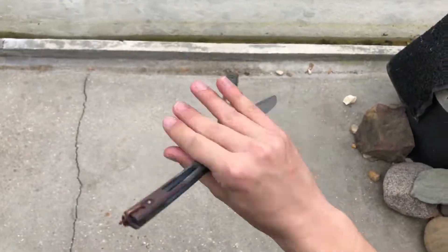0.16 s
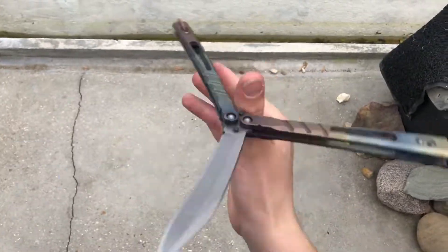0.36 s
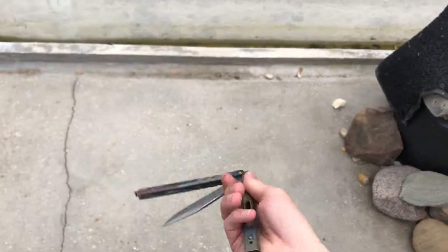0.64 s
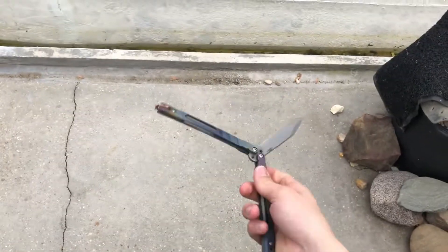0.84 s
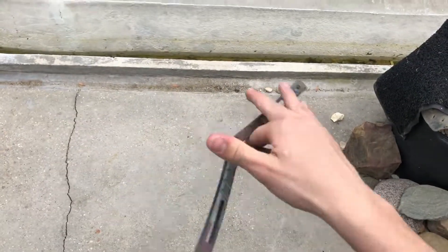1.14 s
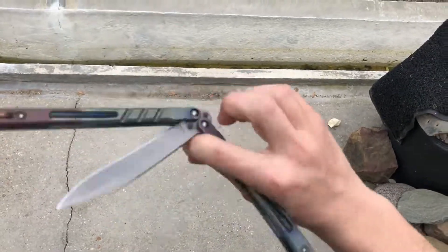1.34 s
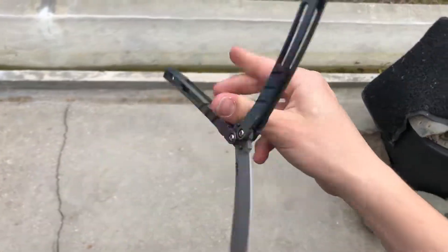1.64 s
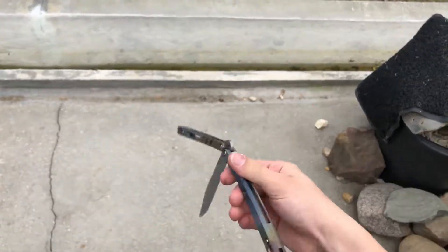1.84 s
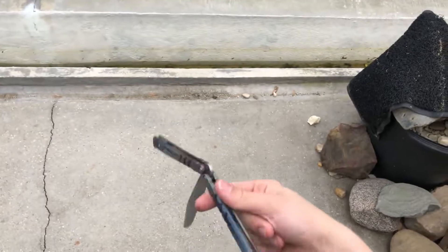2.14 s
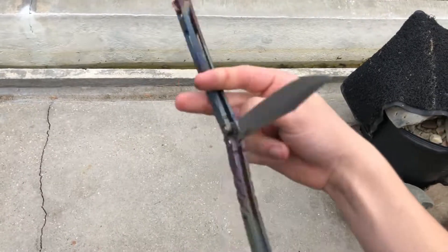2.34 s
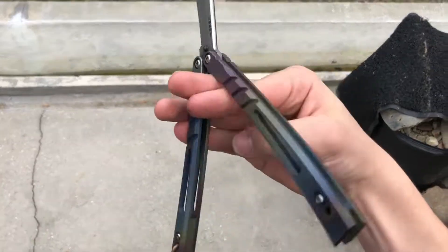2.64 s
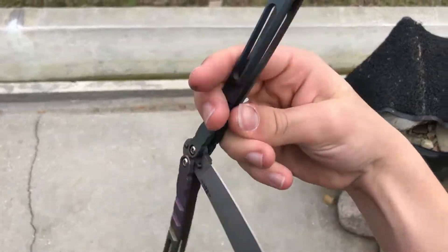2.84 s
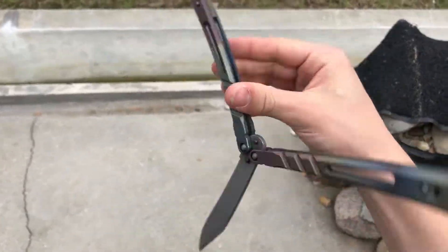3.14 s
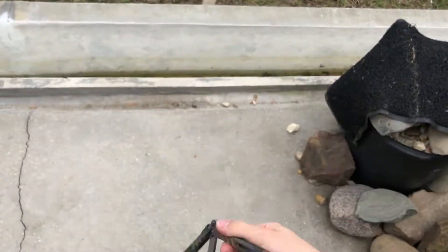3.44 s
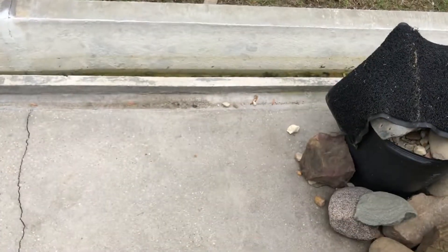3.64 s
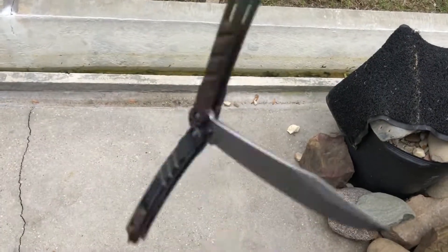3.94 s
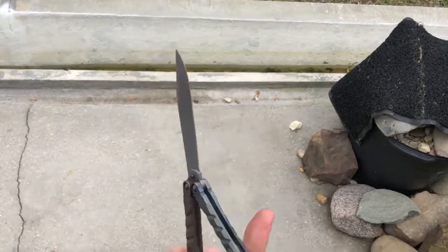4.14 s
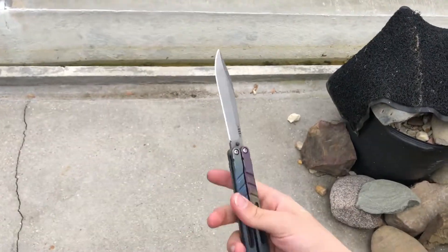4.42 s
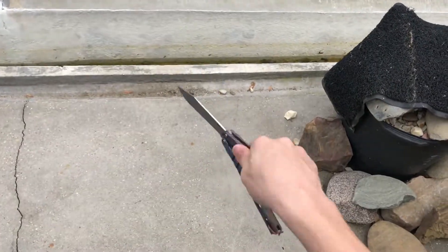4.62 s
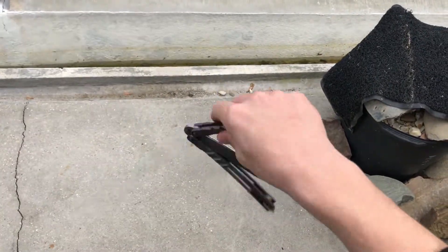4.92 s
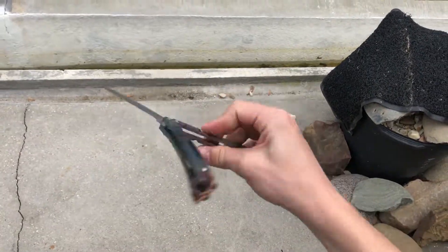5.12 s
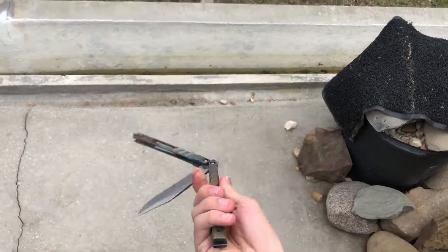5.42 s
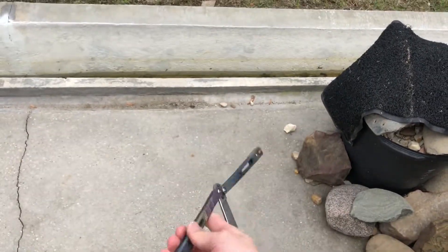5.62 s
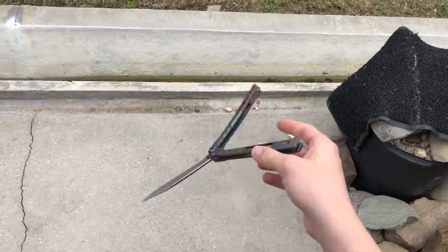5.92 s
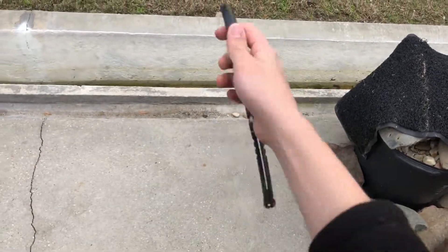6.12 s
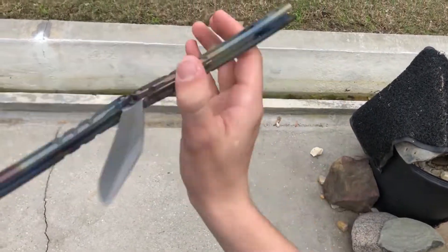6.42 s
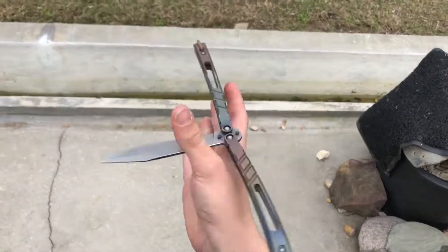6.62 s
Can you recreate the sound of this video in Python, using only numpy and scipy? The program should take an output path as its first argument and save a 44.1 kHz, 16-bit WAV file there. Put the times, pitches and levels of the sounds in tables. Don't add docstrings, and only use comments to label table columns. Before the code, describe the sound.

Outdoors in a concrete yard, a folding knife with two swinging metal handles is flipped close to a phone microphone. Faint low traffic and a thin high insect buzz continue throughout. Light steel touches start at once, while a duck quacks faintly four times between 0.2 and 0.9 s amid tiny bird whistles. Bright dry knocks hit at 0.8 and 1.0 s, then a very hard one at 1.55 s lands with a palm slap. Softer clicks at 2.1 s lead to pin knocks and loose rattling around 2.6 s; the duck calls again from 2.5 to 3.0 s, and a firm clack follows at 3.05 s. Birds chirp. After a knock at 3.7 s, the handles slam at 4.3 s in a loud, buzzing metallic burst. A distant truck drone wavers. Quick bounces rattle at 4.8 s, knocks fall at 5.3 and 5.6 s, then faint taps, finger rubs and a harsh chirp close.

```python
import sys
import numpy as np
from scipy import signal
from scipy.fft import rfft, irfft
from scipy.io import wavfile
from scipy.ndimage import uniform_filter1d

SR = 44100
rng = np.random.default_rng(int(sys.argv[2]) if len(sys.argv) > 2 else 0)


def bounce(signal):
    frames = np.transpose(np.atleast_2d(signal))
    limited = np.clip(frames, -1, 1)
    pcm = np.round(limited * 32767).astype(np.int16)
    wavfile.write(sys.argv[1], SR, pcm)


def voltage_ratio(decibels):
    exponent = np.asarray(decibels, float) / 20
    return 10 ** exponent


N = 298557

# (frequency [Hz], level [dB per Hz])
TRAFFIC_SPECTRUM = [(15, -68.5), (25, -38.5), (42, -19), (65, -21.5), (83, -8.5), (103, -8.5), (167, -16),
                    (445, -30.5), (483, -26.5), (524, -28), (1090, -31), (2980, -49.5), (7300, -59),
                    (8140, -59.5), (16500, -74)]
ROAR_DB = -54

# (time [s], frequency [Hz], level [dB])
TRUCK = [(2.2, 116.6, -56.5), (2.35, 116.3, -51), (3.2, 109.5, -44.5), (3.9, 104.4, -52), (4.2, 104, -42),
         (4.39, 102.5, -36), (4.6, 103, -41.5), (5.0, 101.2, -35), (5.46, 102, -34), (6.02, 102, -36.5),
         (6.46, 102, -46), (6.77, 101.7, -42)]
VAN = [(0, 95, -43.5), (.25, 96, -74), (.9, 98, -60), (1.25, 100.2, -48.5), (2.2, 101.5, -46),
       (2.35, 97.6, -46.5), (2.6, 95.5, -48.5), (3.3, 94.3, -46), (3.7, 92, -61.5), (4.4, 90, -51),
       (5.3, 92, -68), (6.0, 94, -51), (6.77, 94, -68)]
CAR = [(0, 186.8, -56.5), (.9, 193.3, -59.5), (1.2, 187, -63.5), (2.2, 188.8, -59), (3.2, 186.8, -58.5),
       (4.5, 181.7, -61.5), (5.2, 178.5, -67), (5.7, 182.6, -62), (6.2, 192.2, -60.5), (6.77, 191.5, -61.5)]
# (time [s], loss [dB])
GUSTS = [
    (4.298, -11.5),
    (4.488, -15),
    (5.091, -8),
    (5.36, -5.5),
    (5.54, -4.5),
    (5.69, -4.5),
    (5.89, -9.5),
    (6.109, -14.5),
]
GUST_HALF_S = 0.085

INSECT_HZ, INSECT_WIDTH_HZ, INSECT_PULSES_PER_S, INSECT_DB = 8310, 450, 58, -82
# (frequency [Hz], width [Hz], level [dB])
CHORUS = (9000, 1500, -86.5)

# (time [s], length [s], first pitch [Hz], last pitch [Hz], level [dB])
WHISTLES = [(0.138, 0.055, 9950, 9900, -87), (0.263, .03, 9600, 9400, -81), (.35, 0.0565, 9900, 10200, -84),
            (0.193, 0.039, 7470, 6940, -69.5), (0.3, 0.042, 7200, 6960, -80),
            (.695, 0.035, 9750, 9600, -82), (0.744, .03, 9450, 9170, -76),
            (3.326, 0.034, 5430, 5850, -72.5), (3.388, 0.02, 4800, 4580, -71),
            (3.462, 0.097, 6600, 8060, -77.5), (5.007, 0.022, 6260, 6000, -70.5),
            (5.034, 0.092, 6120, 6050, -76), (5.419, 0.11, 3850, 3650, -77),
            (2.063, 0.014, 6200, 7230, -77), (2.897, 0.032, 5590, 5630, -82),
            (5.553, 0.15, 5320, 5400, -87), (5.774, 0.037, 3170, 3210, -73)]
WHISTLE_SHAKE_HZ = 25
# (time [s], length [s], level [dB], pitch shake [Hz])
CHIRPS = [
    (0.544, 0.077, -67.5, 370),
    (1.909, 0.12, -71.5, 270),
    (3.149, 0.081, -69.5, 290),
    (6.449, 0.16, -69, 710),
]
CHIRP_FIRST_HZ, CHIRP_LAST_HZ = 4840, 4140

# (time [s], length [s], pitch [Hz], level [dB], roughness [0-1])
QUACKS = [
    (0.201, 0.063, 258.6, -58.5, 0.56),
    (0.461, 0.046, 245.3, -58, 0.58),
    (0.666, 0.062, 254.4, -53.5, 0.37),
    (0.902, 0.048, 255, -55.5, 0.78),
    (2.509, 0.064, 244, -59, 1.06),
    (2.716, 0.046, 255, -58, 0.73),
    (2.954, 0.052, 238, -54.5, 0.7),
]
# (frequency [Hz], width [Hz], level [dB])
BILL = [(982, 200, 10.5), (1732, 260, 10), (2860, 610, -6), (3150, 720, -4.5), (4670, 730, -17.5)]

# (time [s], length [s], level [dB])
RUBS = [(0.025, .06, -75), (.4, .07, -76), (1.439, 0.14, -74), (1.695, 0.1, -80), (2.316, 0.088, -78),
        (2.802, 0.063, -71), (2.88, 0.029, -77.5), (2.994, 0.064, -76), (3.09, 0.23, -78),
        (4.652, 0.14, -76), (5.395, 0.12, -76.5), (6.12, 0.05, -83), (6.241, 0.066, -75.5),
        (6.46, 0.16, -72)]
# (time [s], level [dB], length [s], last pitch [Hz])
PALM_SLAPS = [
    (1.549, -40.5, 0.0024, 500),
    (1.563, -39, 0.0035, 436),
    (1.58, -46, 0.003, 500),
    (4.227, -31.5, 0.0056, 220),
    (4.292, -44, 0.013, 604),
]
PALM_OPEN_HZ = 1260

# (time [s], peak [dB], low clack [dB], top [dB], handle ring [dB])
KNOCKS = [(0.0422, -35.5, 7.5, -4, -32), (0.832, -18.5, 3.5, 2, -11), (0.8378, -26, -20, -2, -36),
          (1.0396, -10.5, -3, 2.5, -38.5), (1.0682, -20.5, 5.5, 4, -30.5), (1.074, -29, -6, 1, -27),
          (1.0878, -26.5, -2, -10, -23), (1.098, -32, 5, -6, -28), (1.5463, -6.5, 8.5, 6, -17.5),
          (3.69, -29.5, 8, 1.5, -15), (4.2265, -30, 7.5, -13, -32), (4.2665, -18, 9.5, 0, -28),
          (5.2938, -22.5, 9.5, -7.5, -17), (5.635, -18, -1.5, -0.5, -21)]
# (time [s], peak [dB], top [dB], blade ring [dB])
GRAZES = [(0.4153, -49, -1, -16), (0.4482, -44.5, -11, -11), (0.529, -45.5, -3, -11),
          (0.652, -42.5, -11, -16), (0.833, -19, -14, -18), (1.0402, -15.5, 2, -29),
          (1.319, -49.5, -9, -21), (1.497, -51, -15, -31), (1.5473, -8.5, 2.5, -26), (1.5487, -16, 4, -13),
          (1.5616, -12, 2, -14), (1.5628, -9.5, 10, -11), (1.5726, -14, -7, -8), (1.5749, -27, -4, -19),
          (1.759, -56.5, -1, -23), (2.1213, -43, 16, -15), (2.246, -67, 0, -25), (3.1393, -53, 1, -18),
          (3.4383, -50.5, -7, -17), (5.0194, -62, 6.5, -26.5), (5.246, -45.5, 1, -32),
          (6.1393, -64.5, 0, -11.5), (6.2853, -51, -8, -5.5), (6.3608, -55, -3, -8),
          (6.4344, -56.5, 5, -25), (6.4715, -48.5, 0, -9), (6.5368, -46, -4, -18)]
GRAZE_CLACK_DB, GRAZE_RING_DB = 2.5, -28
# (time [s], peak [dB], low clack [dB], top [dB], tang ring [dB])
PIN_KNOCKS = [
    (0.0613, -43, 7, -15, -16),
    (2.114, -31, 10.5, -8, -22),
    (2.142, -34, 13, -4, -17),
    (2.5363, -57, 5, -8, -20),
    (2.5524, -22, 4.5, -3, -20.5),
    (2.607, -41, 4, -8, -3),
    (2.6822, -44, 0, 4, -15),
    (2.6904, -33.5, -6, -19, -28),
    (3.054, -18.5, 7, -2, -12.5),
]
# (time [s], peak [dB], low clack [dB], top [dB], tang ring [dB])
TANG_KNOCKS = [
    (4.778, -23.5, 8, 1, -17),
    (4.7839, -32, -2, -8, -25),
    (4.7895, -25, 2, 0, -13),
    (4.7972, -31, 1, -8, -4),
    (4.8024, -37, -1, -13, -2),
]
# (time [s], peak [dB], ring [dB])
LATCH_TAPS = [(0.4042, -57, -4), (2.02, -46.5, -7), (2.1574, -46, -13), (2.4009, -51.5, -4),
              (2.413, -44, -5.5), (3.332, -51, -2), (4.243, -41, -13), (4.57, -50.5, 0),
              (4.6667, -54.5, -2.5), (4.6732, -56, 0), (4.6803, -49.5, -5), (4.6933, -50, -2),
              (4.734, -55.5, -9), (4.742, -53, -2), (5.156, -54.5, -3.5), (5.5355, -55.5, -4),
              (6.2493, -56.5, -7.5), (6.6107, -43.5, -12.5)]
TAP_CLACK_DB, TAP_TOP_DB, TAP_HIGH_RING_DB, TAP_SCATTER_DB = 0.5, -3, -11, 3.5
# (time [s], peak [dB], low clack [dB], top [dB])
RATTLES = [(2.2047, -39, -8, 3), (2.2135, -34, -2, 0.5), (2.5927, -41, -12, -8), (2.6042, -26.5, -0.5, -12),
           (2.609, -43, 5, 2), (2.6212, -33, -8, -7), (2.6298, -37, 2, -3), (2.6365, -35.5, 2, -7),
           (2.6425, -35, -11, -2), (2.6484, -38.5, 7, -15), (2.5965, -42, -10, -3), (2.6245, -38, -6, 2),
           (3.0945, -48, 0, 2), (3.0915, -37, 4, -3), (4.807, -39, 9, -8)]
RATTLE_MS = 1.9
# (time [s], length [ms], peak [dB], low clack [dB], top [dB])
SLAM = [(4.2914, 5.8, -5.5, 4.5, 1), (4.2965, 6.6, -1.5, -4.5, 5.5), (4.305, 4.5, -10.5, -4.5, 1.5),
        (4.31, 7.4, -17.5, -5, -3.5), (4.3133, 4, -10, -10, -3), (4.3185, 12.6, -19, -7, 1.5),
        (4.3332, 3, -15.5, -5, -2.5), (4.338, 4.6, -24, -6, -4.5), (4.3425, 2.2, -17.5, -5.5, 1.5),
        (4.3449, 8.5, -11.5, -13, -2.5), (4.353, 5, -18.5, -0.5, -7)]
# (time [s], peak [dB], top [dB])
TICKS = [(.236, -63, 3), (.773, -60, 6), (1.018, -59, 9), (1.031, -73, 4), (1.586, -27, -11),
         (2.199, -59, 3), (2.525, -60, -10), (4.761, -51, 6), (6.264, -60, 0), (6.4955, -58, 0),
         (6.552, -60, 3), (.0465, -50, -2)]

# (frequency [Hz], level [dB])
STEEL = [(800, -27.5), (1500, -16), (2100, -8), (4000, -15), (5100, -6.5), (6500, -4.5), (8400, 2.5),
         (9800, -4), (12500, -2.5), (15600, -5), (16900, -17)]
STEEL_T60_S = 0.0046
EVEN_HZ = 700
# (frequency [Hz], level [dB], t60 [s])
CLACK = (2440, -36, 0.017)
# (frequency [Hz], level [dB])
STUBS = [(4550, -40), (5150, -27), (5650, -30), (7450, -26.5), (8400, -27), (9850, -29.5), (11200, -32),
         (12600, -28.5), (13500, -28.5), (15200, -31)]
STUB_T60_S, STUB_SCATTER_DB = 0.009, 3.5
# (frequency [Hz], t60 [s])
FREE_RINGS = [(5090, 0.055), (8060, 0.07), (5650, 0.03), (13000, 0.02), (5094, .15)]
# (frequency [Hz], t60 [s])
PINNED_RINGS = [(4940, 0.13), (1747, 0.039), (7740, 0.03), (13900, 0.015)]
# (frequency [Hz], t60 [s])
TANG_RINGS = [(5130, 0.12), (1790, 0.01), (8020, .05), (13000, .03)]
# (frequency [Hz], t60 [s])
TAP_RINGS = [(5570, 0.025), (13100, .025), (4850, 0.05), (6750, 0.028), (8300, 0.027), (5750, .015),
             (5130, .03)]
# (frequency [Hz], t60 [s])
RATTLE_RINGS = [(4890, 0.12), (7480, 0.037), (5630, .045), (8500, .03), (13300, .03), (1752, 0.034),
                (5120, 0.022)]
# (frequency [Hz], t60 [s])
SLAM_RINGS = [(5100, .05), (7480, .12), (5530, .045), (8600, .045), (12500, .03), (2140, .035)]
BLADE_RING_DB, PINNED_BLADE_DB, TWIN_RING_DB = -24.5, -26, -37

MIC_HISS_DB = -89


def in_time(rows):
    times, *columns = np.transpose(rows)
    return [np.interp(np.arange(N) / SR, times, column) for column in columns]


def rms_one(x):
    return x / np.sqrt(np.mean(x ** 2) + 1e-30)


def drift(rate_hz):
    r = np.exp(-80 * np.pi * rate_hz / SR)
    slow = signal.lfilter([1], [1, -2 * r, r * r], rng.standard_normal(N // 40 + 2002))[2000:]
    return np.interp(np.arange(N) / 40, np.arange(len(slow)), rms_one(slow))


def resonance(x, hz, width_hz):
    r = np.exp(-np.pi * width_hz / SR)
    poles = [1, -2 * r * np.cos(2 * np.pi * hz / SR), r * r]
    return signal.lfilter([(1 - r * r) / 2, 0, (r * r - 1) / 2], poles, x)


def butter(x, order, hz, kind):
    return signal.sosfilt(signal.butter(order, hz, kind, fs=SR, output="sos"), x)


def add(out, time_s, sound):
    i = round(time_s * SR)
    out[i:i + len(sound)] += sound[:N - i]


def traffic():
    out = 0
    edges = 22 * 2 ** np.arange(0, 9.8, 1 / 3)
    white = rng.standard_normal((2, N))
    hz_log, spectrum_db = np.transpose(TRAFFIC_SPECTRUM)[:2]
    for k, (low, high) in enumerate(zip(edges, edges[1:])):
        band = butter(white[k % 2], 2, [low, high], "band")
        band_db = np.interp(np.log(low * high) / 2, np.log(hz_log), spectrum_db)
        out = out + voltage_ratio(band_db + 1.9 * drift(1.0)) * band
    middle = butter(out, 4, [200, 1500], "band")
    return voltage_ratio(ROAR_DB) * out / middle.std()


def engine(rows, orders):
    hz, db = in_time(rows)
    phase = 2 * np.pi * np.cumsum(hz) / SR
    out = np.zeros(N)
    for multiple, order_db in orders:
        level = voltage_ratio(db + order_db + 0.5 * drift(4.3))
        out += level * np.sin(multiple * phase + 1.08 * drift(2.8))
    return np.sqrt(2) * out


def gusts():
    t = np.arange(N) / SR
    return voltage_ratio(sum(loss_db * np.maximum(1 - np.abs(t - s) / GUST_HALF_S, 0) for s, loss_db in GUSTS))


def insect():
    stroke = np.cos(2 * np.pi * np.cumsum(INSECT_PULSES_PER_S + 0.4 * drift(0.26)) / SR)
    hiss = rng.standard_normal(N)
    chorus = rng.standard_normal(N)
    hz, width_hz, chorus_db = CHORUS
    for _ in range(2):
        hiss = resonance(hiss, INSECT_HZ, INSECT_WIDTH_HZ)
        chorus = resonance(chorus, hz, width_hz)
    buzz = voltage_ratio(INSECT_DB + 1.1 * drift(0.56)) * rms_one(hiss * (1 + 0.56 * stroke))
    return buzz + voltage_ratio(chorus_db) * rms_one(chorus)


def birds():
    out = np.zeros(N)
    whistles = [(*row, WHISTLE_SHAKE_HZ) for row in WHISTLES]
    chirps = [(s, length, CHIRP_FIRST_HZ, CHIRP_LAST_HZ, db, shake_hz) for s, length, db, shake_hz in CHIRPS]
    for s, length, first_hz, last_hz, db, shake_hz in whistles + chirps:
        t = np.arange(round(length * SR)) / SR
        shake = rms_one(uniform_filter1d(rng.standard_normal(SR // 4), size=60))[:len(t)]
        hz = first_hz + (last_hz - first_hz) * t / length + shake_hz * shake
        swell = np.sin(np.pi * t / length) ** 0.27
        add(out, s, voltage_ratio(db) * np.sin(2 * np.pi * np.cumsum(hz) / SR) * swell)
    return out


def duck():
    out = np.zeros(N)
    for s, length, hz, db, rough in QUACKS:
        t = np.arange(round(length * SR)) / SR
        breath = rng.standard_normal(SR // 8)[:len(t)]
        pitch = hz * (1 + 0.036 * np.sin(np.pi * t / length))
        halves = np.floor(2 * np.cumsum(pitch) / SR)
        pulses = np.diff(halves, prepend=0) * np.where(halves % 2, 1, 0.55)
        source = (1 - rough) * rms_one(pulses) + rough * breath
        voice = np.zeros(len(t))
        for k, (peak_hz, width_hz, peak_db) in enumerate(BILL):
            peak = resonance(resonance(source, peak_hz, width_hz), peak_hz, 2 * width_hz)
            voice += (-1) ** k * voltage_ratio(peak_db) * peak
        add(out, s, voltage_ratio(db) * rms_one(voice) * np.sin(np.pi * t / length) ** 0.5)
    return out


def yard(x, ground_db, wall_db, scatter_db, t60):
    t = np.arange(SR // 3) / SR
    level = voltage_ratio(scatter_db - 60 * t / t60) * np.minimum(t / 0.011, 1)
    level += voltage_ratio(ground_db) * np.exp(-((t - 0.006) / 0.0007) ** 2)
    level += voltage_ratio(wall_db) * np.exp(-((t - 0.0195) / 0.0025) ** 2)
    echo = level * rng.standard_normal(len(t))
    echo[0] = 1
    return signal.fftconvolve(x, echo)[:N]


def fingers():
    level = np.zeros(N)
    for s, length, db in RUBS:
        add(level, s, voltage_ratio(db) * np.sin(np.pi * np.arange(round(length * SR)) / SR / length))
    grain = rng.standard_normal(N) * voltage_ratio(2.5 * drift(150))
    return level * rms_one(butter(grain, 2, [7000, 15500], "band"))


def palm():
    out = np.zeros(N)
    for s, db, length, last_hz in PALM_SLAPS:
        t = np.arange(round(length * SR)) / SR / length
        hz = PALM_OPEN_HZ * (last_hz / PALM_OPEN_HZ) ** t ** 0.85
        add(out, s, voltage_ratio(db) * np.sin(2 * np.pi * np.cumsum(hz) / SR) * np.sin(np.pi * t))
    return out


def modes(hz, db, t60, phase=0, size=SR // 6):
    t = np.arange(size)[:, None] / SR
    onset = np.minimum(t * 5000, 1)
    return (voltage_ratio(db - 60 * t / t60) * np.sin(2 * np.pi * hz * t + phase) * onset).sum(axis=1)


def contact(peak_db, low_db, top_db, rings, ring_db, chatter_ms, hold=0.59):
    spread = rng.standard_normal((2, 70))
    luck = rng.random((2, 800))
    t = np.arange(800) / SR * 1000 / np.abs(chatter_ms)
    clicks = (luck[0] < 0.15) * (2 * luck[1] - 1) * np.minimum(t / 0.14, 1) * np.exp(-t ** hold)
    clicks[8] = 1.0

    body_hz = np.linspace(800, 16800, 70) + 90 * spread[1]
    body = modes(body_hz, 0, STEEL_T60_S, 2 * np.pi * luck[0, :70], size=500)
    spray = rfft(np.r_[np.zeros(30), signal.fftconvolve(clicks, body)], 2048)
    hz = np.arange(1, 1026) * SR / 2048
    steel_hz, steel_db = np.transpose(STEEL)
    db = np.interp(np.log(hz), np.log(steel_hz), steel_db)
    db += low_db * np.clip((4000 - hz) / 1000, 0, 1)
    db += top_db * np.clip((hz - 8500) / 1000, 0, 1)
    power = uniform_filter1d(np.abs(spray) ** 2, size=round(EVEN_HZ * 2048 / SR))
    spray = spray / np.sqrt(power + 1e-9) * voltage_ratio(db)

    clack_hz, clack_db, clack_t60 = CLACK
    clack = modes(clack_hz, clack_db + low_db, clack_t60, size=1200)
    hollow = rfft(np.r_[np.zeros(38), clack], 2048)

    stub_hz, stub_db = np.transpose(STUBS)
    stub_db = stub_db + STUB_SCATTER_DB * spread[0, :10]
    stubs = modes(stub_hz + 60 * spread[1, -10:], stub_db, STUB_T60_S, size=800)
    rails = rfft(np.r_[np.zeros(30), signal.fftconvolve(clicks, stubs)], 2048) / np.sqrt(np.sum(clicks ** 2))

    gate = np.interp(np.arange(2048), [32, 38, 1600, 1900], [0, 1, 1, 0])
    knock = irfft(spray + hollow + rails) * gate
    ring_hz, ring_t60 = np.transpose(rings)
    count = len(rings)
    ring_hz = ring_hz * (1 + 0.0025 * spread[1, :count])
    ringing = modes(ring_hz, np.array(ring_db), ring_t60, 2 * np.pi * luck[1, :count])
    knock = np.pad(knock / np.abs(knock).max(), (0, len(ringing) - 2018))
    return voltage_ratio(peak_db) * (np.r_[np.zeros(30), ringing] + knock)


def knife():
    out = np.zeros(N)
    grazes = [(s, db, GRAZE_CLACK_DB, top_db, blade_db, GRAZE_RING_DB) for s, db, top_db, blade_db in GRAZES]
    knocks = [(*row, BLADE_RING_DB, handle_db) for *row, handle_db in KNOCKS]
    for s, db, low_db, top_db, blade_db, handle_db in sorted(knocks + grazes):
        ring_db = [blade_db, handle_db, -30, -30, TWIN_RING_DB]
        add(out, s, contact(db, low_db, top_db, FREE_RINGS, ring_db, chatter_ms=0.65))
    for s, db, low_db, top_db, tang_db in PIN_KNOCKS:
        ring_db = [PINNED_BLADE_DB, tang_db, -14, -20]
        add(out, s, contact(db, low_db, top_db, PINNED_RINGS, ring_db, chatter_ms=0.5))
    for s, db, low_db, top_db, tang_db in TANG_KNOCKS:
        ring_db = [-22, tang_db, -24, -26]
        add(out, s, contact(db, low_db, top_db, TANG_RINGS, ring_db, chatter_ms=0.75))
    for s, db, tap_db in LATCH_TAPS:
        ring_db = [tap_db - 4, tap_db + TAP_HIGH_RING_DB, -20, -17, -16, tap_db - 3.5, -17]
        ring_db = ring_db + TAP_SCATTER_DB * rng.standard_normal(size=7)
        add(out, s, contact(db, TAP_CLACK_DB, TAP_TOP_DB, TAP_RINGS, ring_db, chatter_ms=0.69))
    for s, db, low_db, top_db in RATTLES:
        ring_db = [-27, -18, -19, -24, -24, low_db - 21.0, -18]
        add(out, s, contact(db, low_db, top_db, RATTLE_RINGS, ring_db, RATTLE_MS))
    for s, length_ms, db, low_db, top_db in SLAM:
        ring_db = [-26, -30, -25, -25, -29, low_db - 22.0]
        add(out, s, contact(db, low_db, top_db, SLAM_RINGS, ring_db, length_ms, hold=10.0))
    for s, db, top_db in TICKS:
        ring_db = [-27.5, -36.0, -32.0, -28.0, -49.5]
        add(out, s, contact(db, -1, top_db, FREE_RINGS, ring_db, chatter_ms=0.74))
    return butter(out, 3, 800, "high")


def scene():
    truck = gusts() * engine(TRUCK, [(0.99, 1.5), (0.57, -21.5)])
    van = engine(VAN, [(0.95, 0.0081)])
    car = engine(CAR, [(1, 0), (3 / 4, 1.5), (5 / 8, -1.5), (5 / 16, 3.0)])
    far = yard(duck() + birds(), ground_db=-22.5, wall_db=-24.0, scatter_db=-32, t60=0.43)
    near = yard(knife() + palm() + fingers(), ground_db=-38, wall_db=-50, scatter_db=-51.5, t60=0.26)
    return (traffic() + truck + van + car + insect() + far + near)[None]


def band_limit(x):
    return signal.sosfilt(signal.butter(12, 17230, fs=SR, output="sos"), x)


def record(dry):
    hiss = butter(rng.standard_normal(N), 2, 12000, "high")
    x = butter(dry + voltage_ratio(MIC_HISS_DB) * hiss, 2, 42, "high")
    mix = signal.sosfilt(signal.cheby2(8, 60, 17600, fs=SR, output="sos"), np.tanh(x))
    return band_limit(mix)


dry = scene()
out = record(dry)
bounce(out)
```